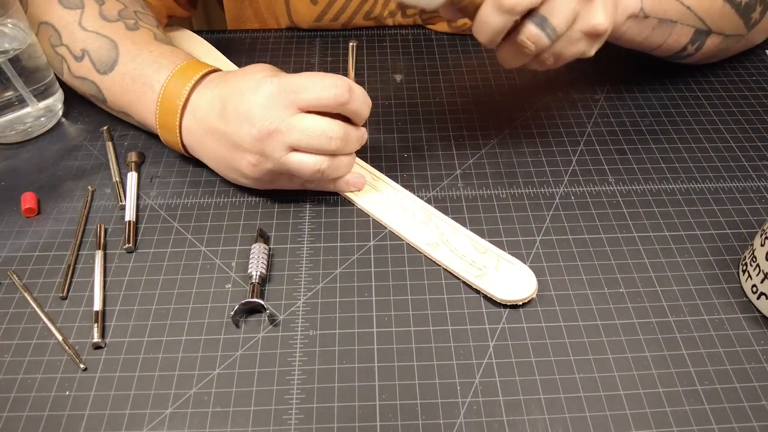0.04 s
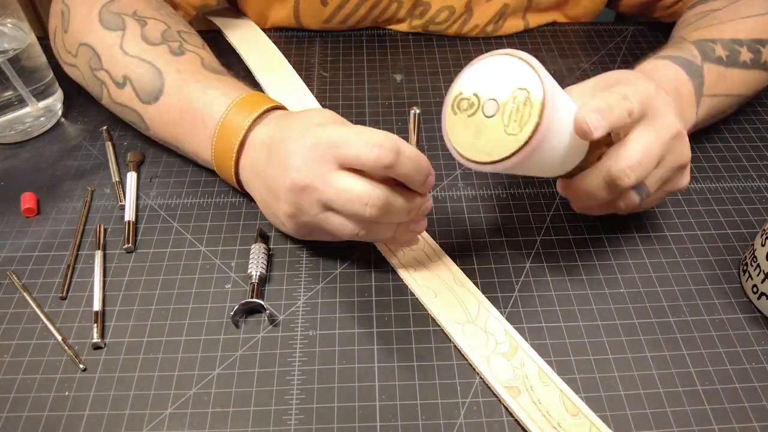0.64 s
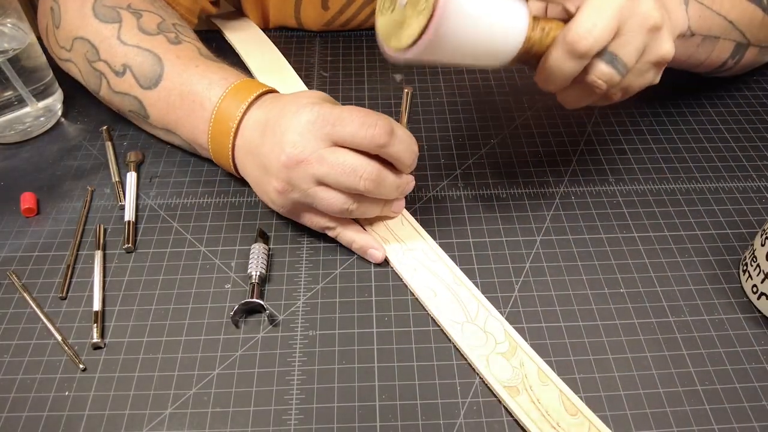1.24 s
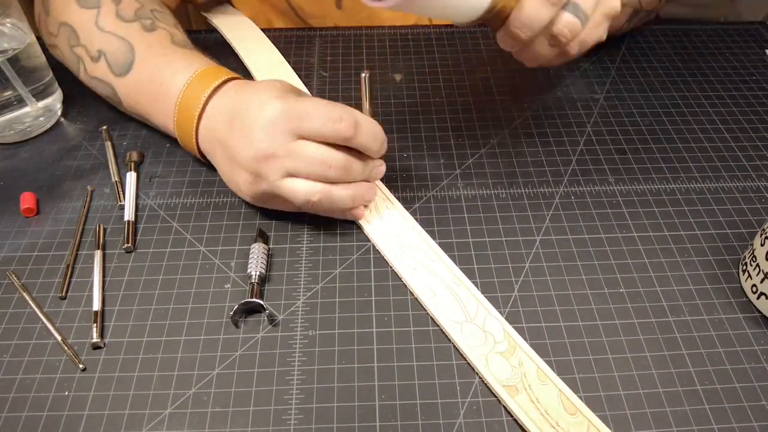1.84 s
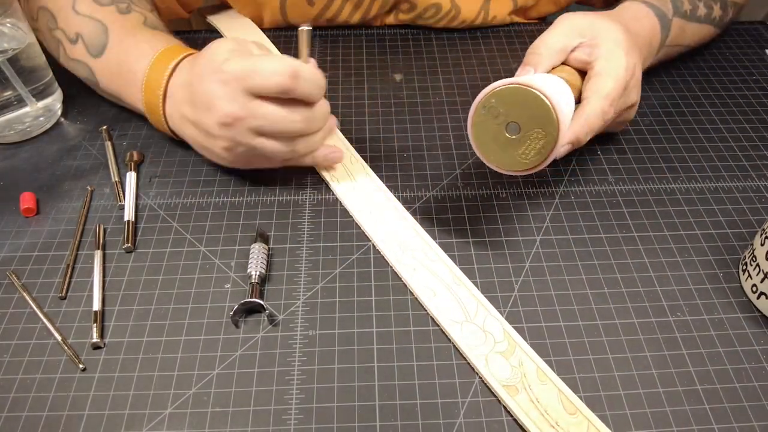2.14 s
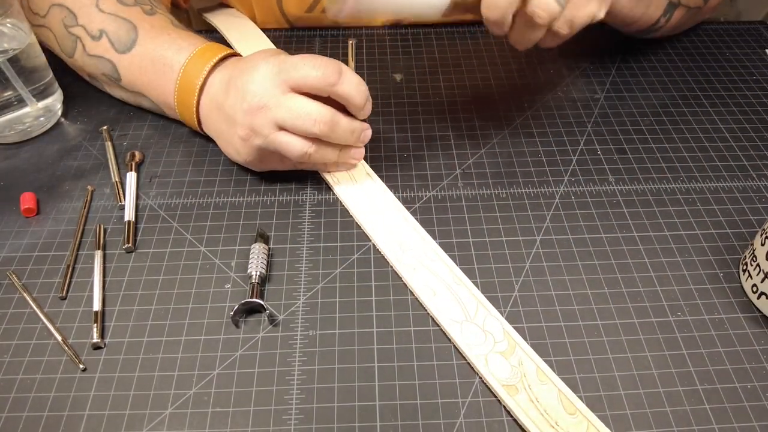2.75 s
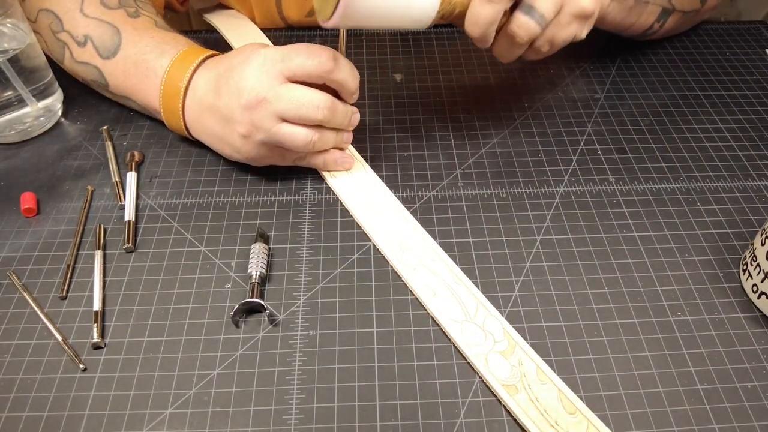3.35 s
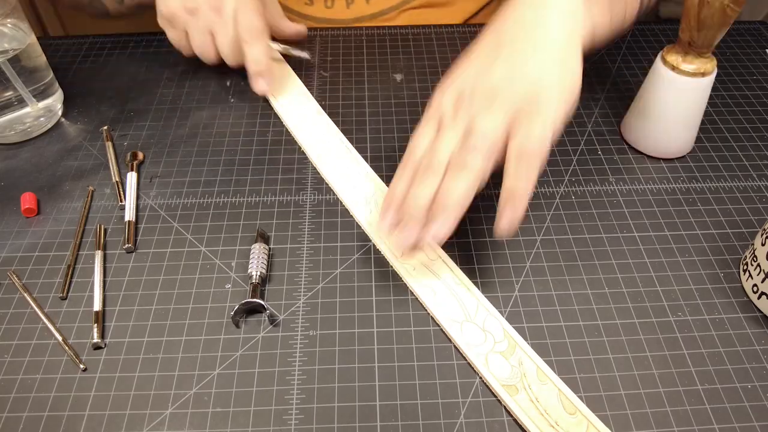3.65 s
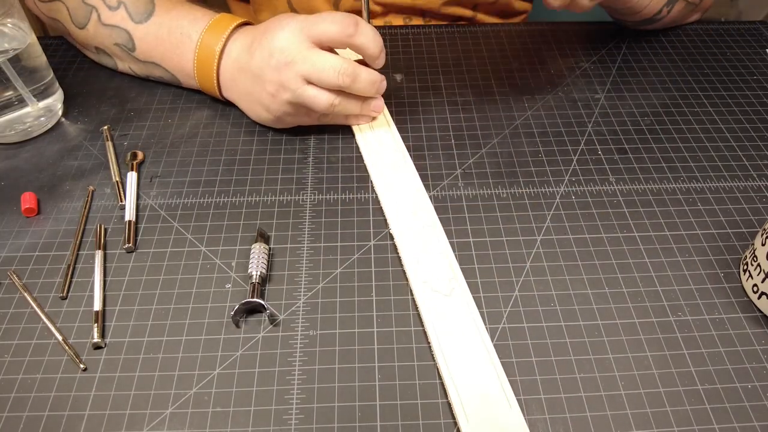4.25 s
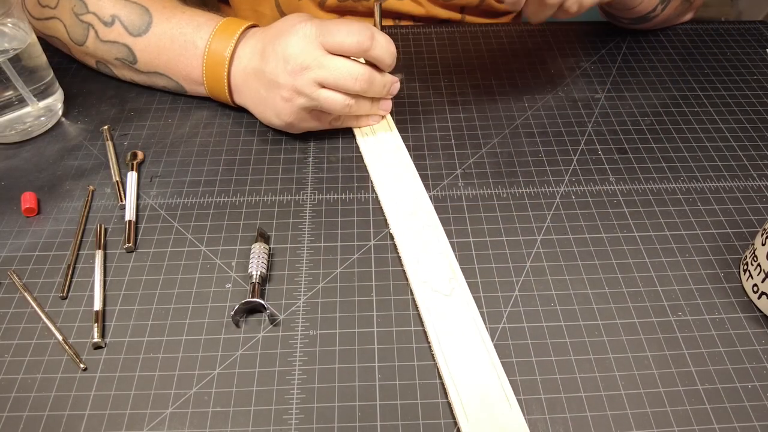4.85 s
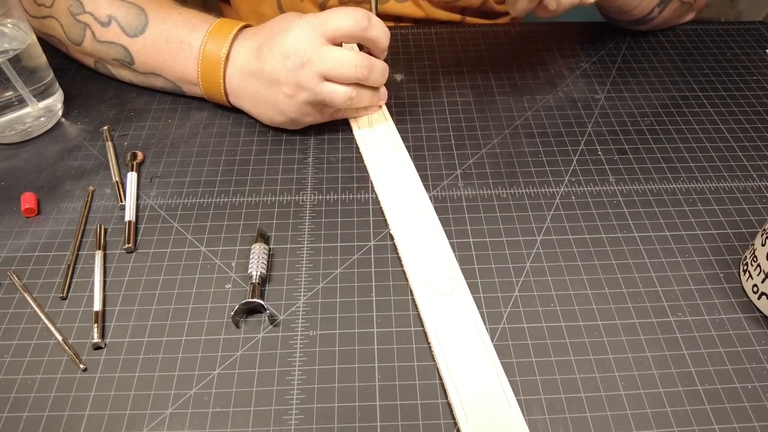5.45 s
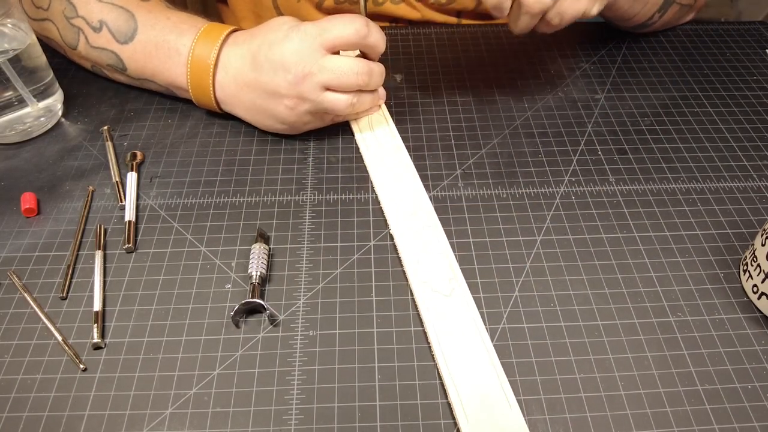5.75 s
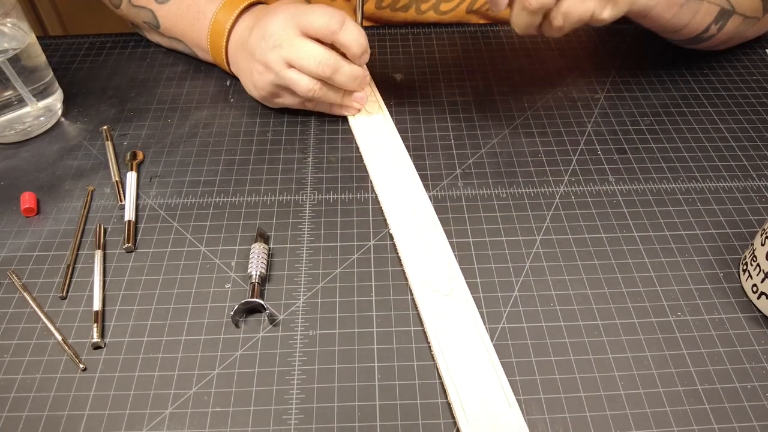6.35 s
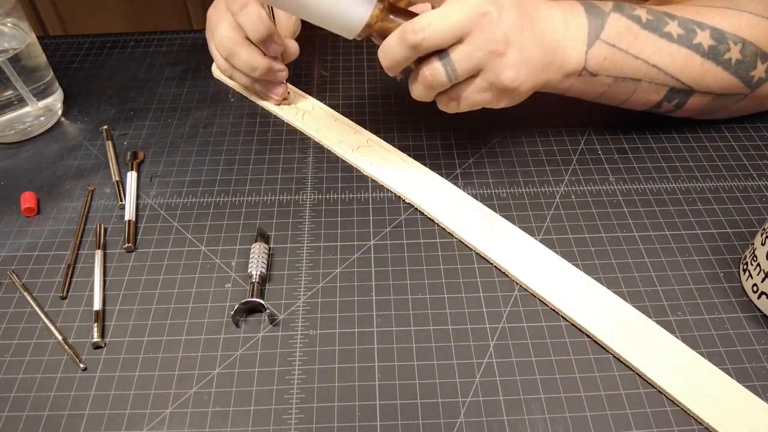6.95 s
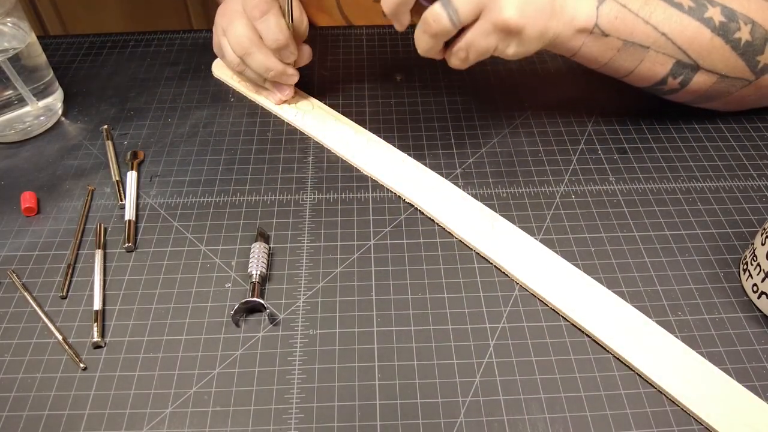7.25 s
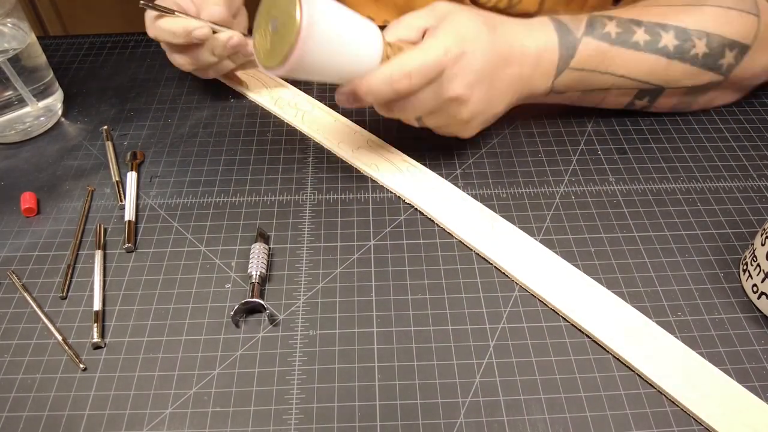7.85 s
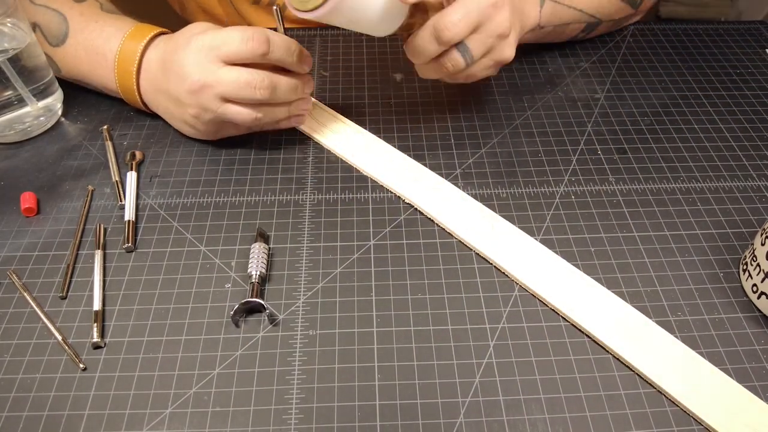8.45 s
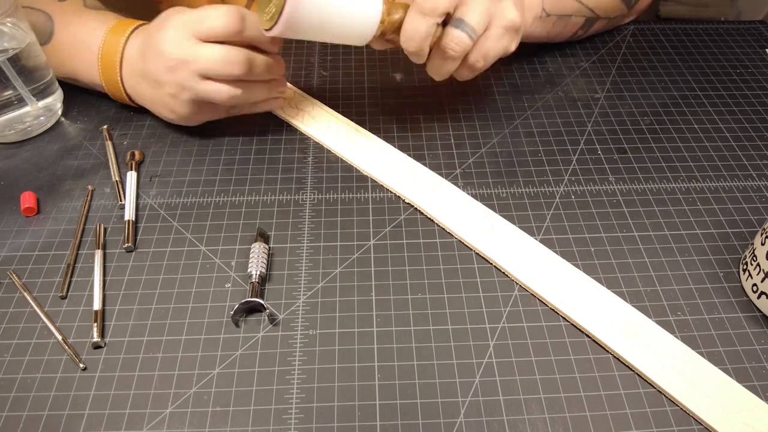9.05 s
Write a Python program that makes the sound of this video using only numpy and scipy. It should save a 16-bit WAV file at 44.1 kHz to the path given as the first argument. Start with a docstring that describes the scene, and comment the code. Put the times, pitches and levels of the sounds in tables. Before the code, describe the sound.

A mallet taps a steel stamp into leather in quick uneven runs, loose tools rattling on the bench over a low hum.

```python
"""Leather tooling at a workbench, over the steady low hum and hiss of the workshop.
From the start a mallet taps a steel stamp into a belt in quick uneven runs: each blow is a woody crack
with a thud of the bench, and loose tools rattle on the mat. Between runs the strap is slid along.
Just after 3 s come a sharp pop, a scrape of the stamp and a soft knock as the mallet is stood down.
The tapping resumes; near 7 s and again at the end, the bench rumbles as an arm shifts on it."""
import sys
import numpy as np
from scipy import signal
from scipy.fft import rfft, irfft
from scipy.io import wavfile

SR = 44100
rng = np.random.default_rng(int(sys.argv[2]) if len(sys.argv) > 2 else 0)


def unload_audio(sound):
    """Save the sound as a 16-bit wav file, at the path given as the first command line argument."""
    columns = np.transpose(np.atleast_2d(sound))
    # keep every value between -1 and 1, then stretch to whole-number steps
    steps = np.round(np.clip(columns, -1, 1) * 32767)
    wavfile.write(sys.argv[1], SR, steps.astype(np.int16))


N = 405279
SHORT = np.arange(2646) / SR  # time in seconds within one short sound

# A mode is one tone an object rings with; fade_s is the time it takes to fall by 60 dB.
# modes of the tools' steel shafts: pitch_hz, level_db, fade_s
SHAFT_MODES = [(2440, 1, 0.0053), (2698, 2.5, 0.017), (2900, 1.5, 0.0081), (2970, -1.5, 0.008),
               (3840, -17.5, 0.011)]


def from_db(db):
    """Turn decibels into a gain."""
    return 10 ** (np.asarray(db) / 20)


def at_level(x, db):
    """Give a short sound the energy of a steady one held at this level for 5 ms."""
    energy = np.mean(np.sum(x ** 2, axis=-1))
    return from_db(db) * x / np.sqrt(energy / (.005 * SR) + 1e-20)


def add(out, start_s, sound):
    """Mix a short sound in at its start time."""
    at = max(round(start_s * SR), 0)
    out[:, at:at + len(SHORT)] += sound[..., :N - at]


def butter(x, hz, kind, order=2):
    """Keep the lows, the highs or a band of a sound."""
    return signal.sosfilt(signal.butter(order, hz, kind, fs=SR, output="sos"), x)


def swell(middle_s, half_s):
    """A bell-shaped rise and fall."""
    return np.exp(-.5 * np.minimum(((np.arange(N) / SR - middle_s) / half_s) ** 2, 100))


def swells(rows):
    """A loudness curve with one swell for each row."""
    return sum(from_db(db) * swell(middle_s, half_s) for middle_s, half_s, db in rows)


def ring(modes, vary_db, detune, side_db):
    """A struck object's fading tones, a little different at each touch and in each ear."""
    hz, db, fade_s = np.transpose(modes)[:, :, None]
    strength, shift, side, angle = rng.standard_normal((4, len(modes), 1))
    phase = 2 * np.pi * hz * (1 + detune * shift) * SHORT
    fade = from_db(db + vary_db * strength - 60 * SHORT / fade_s)
    signs = (-1) ** np.arange(len(modes))[:, None]
    common = np.sum(fade * np.sin(phase) * signs, axis=0)
    opposed = from_db(side_db) * np.sum(fade * side * np.sin(phase + np.pi * angle), axis=0)
    return common + opposed * np.array([[1], [-1]])


def bounce(sound, spread_s, count, share):
    """A first touch, then a few more at random, each up to share times as strong."""
    when, size = rng.random((2, count))
    force = np.zeros(len(SHORT))
    force[0] = 1
    np.add.at(force, (when * spread_s * SR).astype(int), share * (2 * size - 1))
    return signal.fftconvolve(sound, force[None], axes=1)[:, :len(SHORT)]


def hum_and_hiss(flutter_db):
    """A steady hum and hiss; the background flutters slightly and drops out for an instant a few times."""
    # noise alike in both ears, and noise opposite in each: pitch_hz, common_db, opposed_db
    spectrum = [(40, -57, -80), (115, -58, -77.5), (174, -60.5, -78.5), (306.4, -69, -79.5),
                (595, -84, -86.5), (840, -81.5, -82), (1110, -89.5, -86), (1320, -87, -96.5),
                (3170, -90.5, -96), (4560, -94.5, -100), (6480, -99.5, -103), (7470, -106, -110),
                (10440, -112.5, -115.5), (15700, -116, -118)]
    # broad resonances in the hiss: pitch_hz, half_width_hz, boost_db
    peaks = [(1473, 212, 7.5), (2550, 194, 7), (4125, 210, 6)]
    # dips in level: middle_s, half_length_s, change_db
    dips = [(1.643, 0.004, -15), (2.71, 0.0016, -19), (4.505, 0.0018, -15), (4.705, 0.0032, -26),
            (6.65, 0.0037, -21)]
    hz = np.maximum(np.fft.rfftfreq(N, 1 / SR), 1)
    points_hz, common_db, opposed_db = np.transpose(spectrum)
    peaks_db = sum(db * np.exp(-.5 * ((hz - centre) / width) ** 2) for centre, width, db in peaks)

    def noise(db, peak_share):
        gain = from_db(np.interp(np.log(hz), np.log(points_hz), db) + peak_share * peaks_db)
        return irfft(rfft(rng.standard_normal(N)) * gain, N) * np.sqrt(SR / 2)

    air = noise(common_db, 0.78) + noise(opposed_db, 0.44) * np.array([[1], [-1]])
    air += butter(air, 90, "low", order=1) * np.array([[.13], [-.13]])  # the hum leans left
    flutter = butter(rng.standard_normal(N), 63, "low")
    dip_db = sum(db * swell(middle_s, half_s) for middle_s, half_s, db in dips)
    return air * from_db(flutter_db * flutter / flutter.std() + dip_db)


def bench_thud(push_s, hz, width_hz, dip_share):
    """The leather cushions the blow into a soft push; the bench dips, then springs back."""
    push = np.sin(np.pi * np.minimum(SHORT / push_s, 1)) ** 2
    decay = np.exp(-np.pi * width_hz / SR)
    resonance = [1, -2 * decay * np.cos(2 * np.pi * hz / SR), decay * decay]
    swing = -signal.lfilter([1, 0, -1], resonance, push)
    swing /= np.abs(swing).max()
    return swing + (1 - dip_share) * swing ** 2  # the mat yields going down, so the upswing is stronger


def mallet():
    """Each blow rings the mallet and stamp and thuds the bench; harder hits snap louder."""
    # blows on the stamp: start_s, thud_db, push_s, body_db, knock_db, clack_db, steel_db,
    # hardness_db (snap above an ordinary blow), snap_hz, ping_db, tick_db
    blows = [(0.0523, -15, 0.0039, -32, -35.5, -35, -41.5, 10, 3770, -54, -56),
             (0.096, -33, 0.0032, -40.5, -47, -55, -58, -4, 3500, -57, -61),
             (0.1175, -18, .0037, -38.5, -42, -40, -45, 5, 3750, -63, -67),
             (0.2933, -18.5, 0.0041, -32.5, -36, -34.5, -40, 12, 3380, -55, -57),
             (0.4343, -15.5, 0.0038, -36.5, -39, -43, -43, 8, 3680, -57, -62),
             (0.9708, -37, 0.007, -41, -43, -48, -51, -10, 3550, -63, -61),
             (1.015, -18.5, .0041, -35, -27, -30.5, -41, 22, 3640, -59, -58),
             (1.158, -23.5, 0.0027, -38, -34.5, -38, -42, 8, 3700, -68, -58),
             (1.3079, -23, 0.0041, -34, -29.5, -34.5, -47.5, 13, 3280, -53.5, -57),
             (1.482, -24, .0035, -35, -31, -37, -45, 10, 3300, -64, -57),
             (1.834, -17.5, 0.004, -35.5, -34.5, -38, -42, 11, 3270, -58, -59),
             (2.5797, -25, 0.003, -45, -41, -42, -46, 0, 3450, -75, -76),
             (2.704, -25, 0.0038, -44, -39, -40, -51, 0, 3300, -63, -64),
             (2.8241, -17, 0.0039, -36, -40, -31, -52, 25, 3090, -52, -53),
             (2.9019, -20.5, 0.0028, -42, -51, -37, -39, 10, 3420, -70, -72),
             (3.5585, -19.5, 0.0031, -45, -40, -40, -46, -3, 3550, -67, -67),
             (3.5867, -33, 0.0034, -41, -41, -44, -49, 1, 3300, -62, -62),
             (4.4789, -15, 0.0038, -37, -26.5, -32.5, -41, 12, 3700, -55, -57),
             (4.5839, -23.5, 0.0038, -46, -36.5, -41, -48, -4, 3250, -75, -76),
             (4.6262, -17, 0.0032, -41, -28.5, -35, -41, 4, 4000, -57, -61),
             (4.689, -17, 0.0039, -36, -25.5, -30, -37, 3, 3170, -60, -52),
             (5.008, -29.5, 0.0031, -39, -31.5, -39, -47, 2, 3250, -59, -59),
             (5.0393, -15, 0.004, -36, -27.5, -34, -43, 1, 3800, -58, -60),
             (5.244, -39, 0.0034, -49, -42.5, -45, -63.5, -9, 3800, -69, -71),
             (5.4859, -24.5, 0.0044, -42, -33, -36, -36, 6, 3230, -64, -63),
             (5.6286, -46, 0.0043, -44, -37, -53, -56, -10, 3500, -68, -69),
             (5.6576, -18, 0.0039, -37, -26, -38, -38.5, 5, 4070, -62, -64),
             (5.879, -35, 0.0032, -50, -42.5, -57, -50, -20, 3250, -75, -76),
             (6.2913, -25, 0.0038, -39, -28.5, -34.5, -39.5, 11, 4050, -46, -51.5),
             (6.4665, -19, 0.0032, -41, -28, -29.5, -29.5, 24, 3930, -57, -52),
             (6.5699, -16.5, 0.0039, -41, -30, -37, -34, 2, 3850, -57, -69),
             (7.8035, -17, 0.0032, -45, -31, -36.5, -46, 2, 4020, -65, -67),
             (7.888, -24, 0.0034, -44.5, -44, -53, -63.5, -14, 4050, -75, -76),
             (8.3321, -20, 0.004, -38.5, -29.5, -34, -34.5, 7, 3600, -61, -59),
             (8.7356, -29, 0.0043, -35, -33.5, -41.5, -47, 3, 3100, -59, -60),
             (8.959, -39, .0037, -40, -37.5, -44, -46, -5, 3800, -63, -64)]
    # ringing parts: pitch_hz, level_db, fade_s
    body_modes = [(630, 2, 0.0018), (945, -0.5, 0.015)]  # mallet's hollow body
    knock_modes = [(1230, 4, 0.017), (1450, 13, 0.013), (1733, -6.5, 0.015)]  # mallet head, lower tones
    clack_modes = [(1893, 12, 0.0066), (2250, 0.9, 0.012)]  # mallet head, upper tones
    stamp_modes = [(2656, 2, 0.017), (2880, -7, 0.011)]  # stamp's shaft
    ping_modes = [(4840, -9, 0.0056), (5920, -2.5, 0.0069)]  # stamp's metallic ping
    tick_modes = [(7140, -13, 0.0073), (7700, -8, 0.0065), (8200, -9, 0.0068), (10170, -6, 0.003),
                  (13400, -16, 0.0045)]  # stamp's highest tones
    # snap of a hard, square hit: pitch_ratio, level_db, fade_s
    snap_modes = [(.91, 5, 0.003), (1, 16.5, 0.0051), (1.05, 5, 0.0065)]
    ordinary_snap_db, thud_lead_s = -56, 0.00049  # the bench gives just before the crack
    out = np.zeros((2, N))
    for (start_s, thud_db, push_s, body_db, knock_db, clack_db, steel_db,
         hardness_db, snap_hz, ping_db, tick_db) in blows:
        steel = ring(stamp_modes, vary_db=2, detune=.015, side_db=-15)
        body = ring(body_modes, vary_db=2.5, detune=.03, side_db=-11)
        knock = ring(knock_modes, vary_db=2.5, detune=.018, side_db=-17)
        clack = ring(clack_modes, vary_db=2.5, detune=.015, side_db=-14)
        snap = ring(np.array(snap_modes) * [snap_hz, 1, 1], vary_db=2, detune=.01, side_db=-11)
        ping = ring(ping_modes, vary_db=2, detune=.01, side_db=-6)
        tick = ring(tick_modes, vary_db=2.5, detune=.015, side_db=-6)
        # the mallet face chatters on the stamp before it settles
        snap = bounce(snap, spread_s=.002, count=3, share=.3)
        ping = bounce(ping, spread_s=.002, count=3, share=.31)
        tick = bounce(tick, spread_s=.0017, count=3, share=.96)
        parts = [(body_db, -body, [450, 1200]), (knock_db, -knock, [950, 2100]),
                 (clack_db, clack, [1650, 3100]), (steel_db, steel, [2200, 3300]),
                 (ordinary_snap_db + hardness_db, snap, [2700, 4400]),
                 (ping_db, ping, [4600, 7000]), (tick_db, tick, [6500, 15000])]
        for db, sound, band_hz in parts:
            add(out, start_s, at_level(butter(sound, band_hz, "band"), db))
        thud = bench_thud(push_s, hz=210, width_hz=690, dip_share=0.9)
        add(out, start_s - thud_lead_s, at_level(thud, thud_db) * from_db([[.7], [.2]]))
    return out


def reflections(x):
    """The bench and walls send back a few dull echoes."""
    # echoes: delay_s, left_db, right_db
    echoes = [(.0041, -16.5, -33), (.0058, -68, -23.5), (.0083, -54, -54), (0.0122, -23.5, -36)]
    dull = butter(x, 5100, "low")
    out = np.zeros((2, N))
    for delay_s, left_db, right_db in echoes:
        delayed = np.pad(dull, ((0, 0), (round(delay_s * SR), 0)))[:, :N]
        out += from_db([[left_db], [right_db]]) * delayed
    return out


def tool_rattles():
    """Loose tools hop on the mat, touching many times in a few milliseconds and scraping as they land."""
    # light knocks and hops: start_s, bench_db, clatter_db, shaft_db
    rattles = [(0.058, -29, -35.5, -42), (0.265, -25.5, -42, -39.5), (0.301, -29, -44, -46.0),
               (0.368, -29, -40, -45), (0.376, -35, -47, -43), (0.392, -27, -48, -45),
               (0.439, -25, -32, -39), (0.821, -29, -36, -34), (0.827, -41, -41, -46),
               (0.854, -55, -53, -42), (1.021, -45, -43, -41), (1.037, -52.0, -50, -45),
               (1.077, -27, -38.5, -43), (1.131, -21.5, -33, -28.5), (1.139, -49, -52, -42.5),
               (1.219, -27.5, -40, -42.5), (1.33, -28.5, -38, -34.0), (1.339, -32, -43.5, -39),
               (1.361, -32, -45, -44), (1.41, -21, -36, -27.5), (1.437, -47, -43, -42),
               (1.46, -41, -58.0, -46), (1.498, -31, -46.0, -48.0), (1.523, -22, -34.5, -38),
               (1.688, -30, -47.0, -45.5), (1.71, -37, -48, -42.5), (1.84, -29, -39, -46),
               (2.477, -36, -44, -47), (2.507, -29.5, -40, -43.5), (2.657, -30, -42.5, -40.5),
               (2.85, -27, -39, -45.5), (2.877, -28, -36, -31), (2.882, -31, -41, -49),
               (2.996, -31, -41, -43), (3.006, -28.5, -40, -45), (3.082, -26.5, -41, -50),
               (3.272, -34, -37.5, -32), (3.299, -21, -36, -46), (3.377, -31, -41, -37.5),
               (3.401, -30, -40, -43.0), (3.432, -33.5, -46, -57), (3.492, -29, -39, -44),
               (3.533, -31, -36, -43), (4.41, -52, -43, -43), (4.436, -24.5, -31.5, -40),
               (4.485, -33, -31, -42), (4.566, -28, -40, -42), (4.588, -27.5, -36, -46.5),
               (4.696, -45, -39, -41), (5.048, -30, -31, -44), (5.516, -29, -40.0, -36),
               (5.573, -27, -36, -45), (5.599, -46, -42, -42), (5.662, -36, -55, -53.5),
               (5.726, -29, -38, -43), (5.801, -25.5, -43, -54), (5.854, -36, -41, -50.0),
               (5.932, -29.5, -50, -54), (6.313, -34, -50, -38.5), (6.366, -29, -43, -43),
               (6.388, -29.5, -35, -33), (6.416, -28.5, -37, -41), (6.444, -30, -36, -29),
               (6.453, -32, -45, -41.5), (6.494, -28, -45, -43), (6.734, -28, -39, -38),
               (7.167, -28.5, -43, -36.5), (7.27, -42, -39.5, -48.0), (7.321, -35, -52, -39),
               (8.478, -26, -41.5, -58), (8.764, -27.5, -39, -38.5), (8.771, -30.5, -52.0, -42),
               (8.881, -38, -41.5, -52), (8.971, -28.5, -47, -48), (9.023, -30, -45, -49),
               (9.075, -34, -42.5, -48)]
    # ringing parts: pitch_hz, level_db, fade_s
    bench_modes = [(235, -0.5, 0.012), (325, -2.5, 0.016), (476, -8.5, 0.0064)]  # bench top, lightly knocked
    clatter_modes = [(810, 7.5, 0.0031), (1270, -4, 0.017), (1517, -0.5, 0.014), (1714, 1.5, 0.015),
                     (2160, -8, 0.011)]  # tools hitting the mat
    build_up = 1 - np.exp(-SHORT / 0.00071)  # a rattle grows over its first touches
    out = np.zeros((2, N))
    for start_s, bench_db, clatter_db, shaft_db in rattles:
        bench = ring(bench_modes, vary_db=2.5, detune=.05, side_db=-14)
        clatter = ring(clatter_modes, vary_db=2, detune=.035, side_db=-10)
        shaft = ring(SHAFT_MODES, vary_db=2, detune=.02, side_db=-13)
        clatter = bounce(clatter, spread_s=.0048, count=7, share=1.4)
        shaft = bounce(shaft, spread_s=.00375, count=5, share=.7)
        grit = butter(rng.standard_normal(len(SHORT)), [900, 4300], "band")
        grit *= from_db(-60 * SHORT / 0.011)
        steel = at_level(clatter, clatter_db) + at_level(shaft, shaft_db) + at_level(grit, shaft_db - 27)
        add(out, start_s, at_level(butter(bench, 473, "low", order=4), bench_db))
        add(out, start_s, butter(steel * build_up, 3700, "low", order=3))
    return out


def friction(strokes, modes, slips_per_s):
    """Steel sticks and slips; every slip is a tiny click that sets a mode ringing."""
    grains = np.zeros((2, N))
    for mode in modes:
        slips = (rng.random(N) < slips_per_s / SR) * rng.standard_normal(N)
        tone = ring([mode], vary_db=0, detune=0, side_db=-10)
        grains += signal.oaconvolve(butter(tone, 1200, "high"), slips[None], axes=1)[:, :N]
    return swells(strokes) * butter(grains, 4400, "low") / grains.std()


def tool_chatter():
    """The tools' shafts rub and chatter faintly between blows."""
    # rubs: middle_s, half_length_s, level_db
    rubs = [(.36, 0.054, -57), (1.1, 0.066, -60), (1.39, 0.068, -58), (2.9, .05, -51), (3.45, 0.14, -57),
            (5.56, 0.056, -54), (6.42, 0.039, -54)]
    return friction(rubs, SHAFT_MODES, slips_per_s=210)


def tool_tinks():
    """Steel touches steel with a thin tink."""
    # touches: start_s, level_db
    tinks = [(.349, -58), (.855, -56), (1.412, -57), (4.411, -55), (4.437, -50), (6.313, -44.5),
             (6.367, -54), (6.39, -53), (6.445, -41.5), (6.453, -55)]
    # tips of the tools: pitch_hz, level_db, fade_s
    tip_modes = [(4020, 4, 0.014), (4380, -4, 0.008), (7760, -13, 0.005), (10400, -21, 0.003)]
    out = np.zeros((2, N))
    for start_s, db in tinks:
        tink = ring(tip_modes, vary_db=2, detune=.015, side_db=-8)
        tink = bounce(tink, spread_s=.0047, count=4, share=1)
        add(out, start_s, at_level(butter(tink, 3400, "high"), db))
    return out


def strap_slides():
    """Hand and leather rub on the mat: a papery swish with a thin bright top."""
    # slides: middle_s, half_length_s, level_db
    slides = [(.63, 0.061, -54), (2.195, 0.0064, -36), (2.247, .006, -49), (3.942, 0.0075, -42),
              (4.113, 0.035, -56), (4.378, 0.033, -54), (6.877, 0.013, -47), (8.22, .025, -66)]
    noise = rng.standard_normal(N) + 0.63 * rng.standard_normal((2, N))
    top = butter(noise, [2500, 10500], "band", order=1) * from_db(-13)
    swish = butter(noise, [600, 4200], "band") * from_db(-3.5)
    return swells(slides) * (top + swish)


def stamp_clinks():
    """A stamp rings briefly as it is picked up or set."""
    # clinks: start_s, level_db
    clinks = [(.822, -43.5), (2.194, -45), (2.2, -41)]
    # the stamp's ring: pitch_hz, level_db, fade_s
    clink_modes = [(3110, 13, .013), (3380, -25, .006)]
    out = np.zeros((2, N))
    for start_s, db in clinks:
        clink = ring(clink_modes, vary_db=1.5, detune=.008, side_db=-10)
        add(out, start_s, at_level(butter(clink, 2400, "high"), db))
    return out


def clicks_and_pop():
    """Dry clicks and one sharp pop: the wave jumps, then falls back without ringing."""
    # clicks: start_s, level_db
    clicks = [(1.191, -38), (1.333, -37), (4.708, -35.5), (5.498, -28), (6.352, -39), (6.657, -34.5),
              (6.717, -32.5), (7.88, -35), (7.985, -38)]
    # pop: start_s, peak_db, length_s
    pop = [(3.1056, -13.5, 0.0011)]
    out = np.zeros((2, N))
    for start_s, db in clicks:
        add(out, start_s, at_level(np.exp(-SHORT / 0.0034), db))
    for start_s, db, length_s in pop:
        add(out, start_s, from_db(db) * (1 - np.minimum(SHORT / length_s, 1) ** 3))
    return out


def stamp_scrapes():
    """The stamp's face drags on the leather as it is set."""
    # scrapes: middle_s, half_length_s, level_db
    scrapes = [(3.301, 0.0021, -30.5), (3.308, 0.002, -30.5), (3.317, 0.0036, -41)]
    # the dragged face: pitch_hz, level_db, fade_s
    face_modes = [(890, 4, 0.0053), (1730, 1, 0.0065), (2190, 1, 0.007), (2960, -0.5, 0.011),
                  (3200, -14, 0.0057), (4100, -13, 0.005)]
    return friction(scrapes, face_modes, slips_per_s=3400)


def mallet_set_down():
    """The mallet is stood down with a soft hollow knock."""
    # knock: start_s, level_db, pitch_hz, fade_s
    set_down = [(3.703, -37.5, 654, 0.0088)]
    out = np.zeros((2, N))
    for start_s, db, hz, fade_s in set_down:
        knock = np.sin(2 * np.pi * hz * SHORT) * from_db(-60 * SHORT / fade_s)
        add(out, start_s, at_level(butter(knock, [450, 950], "band"), db))
    return out


def bench_rumbles():
    """The bench top groans in its lowest resonance as an arm shifts on it."""
    # rumbles: middle_s, half_length_s, level_db
    rumbles = [(6.89, 0.087, -36.5), (9.1, 0.032, -40)]
    groan = butter(rng.standard_normal(N), [115, 205], "band")
    return swells(rumbles) * groan / groan.std()


def scene():
    """Work at the bench, its echoes, the smaller sounds and the background."""
    work = tool_chatter() + stamp_scrapes() + mallet() + tool_rattles() + tool_tinks() + stamp_clinks()
    background = hum_and_hiss(flutter_db=1.87)
    small_sounds = strap_slides() + clicks_and_pop() + mallet_set_down() + bench_rumbles()
    return background + work + reflections(work) + small_sounds


def record(dry):
    """Cut the deepest rumble and the highest treble."""
    treble_cut = signal.ellip(10, .1, 80, 15850, fs=SR, output="sos")
    return signal.sosfilt(treble_cut, butter(dry, 7.4, "high"))


dry = scene()
out = record(dry)
unload_audio(out)
```